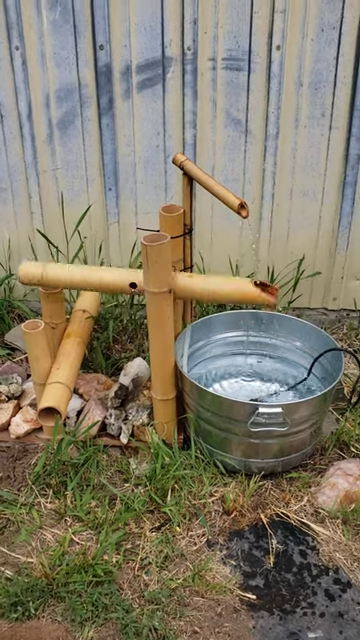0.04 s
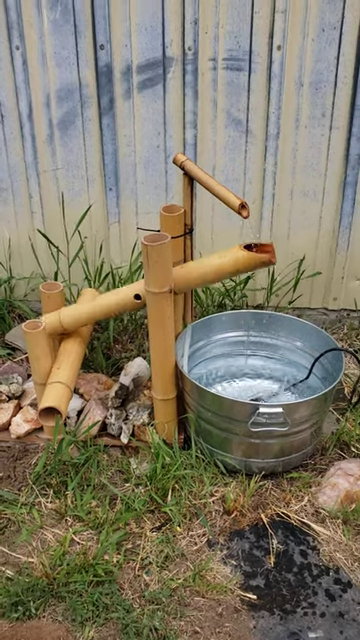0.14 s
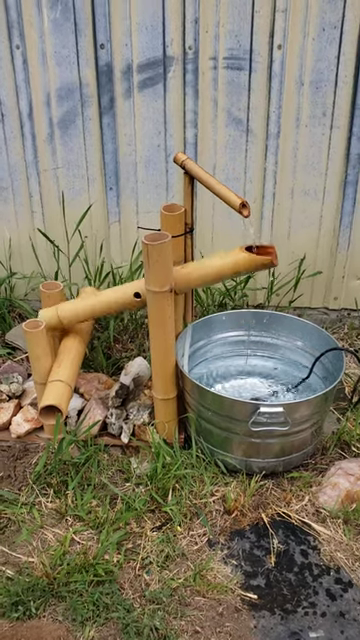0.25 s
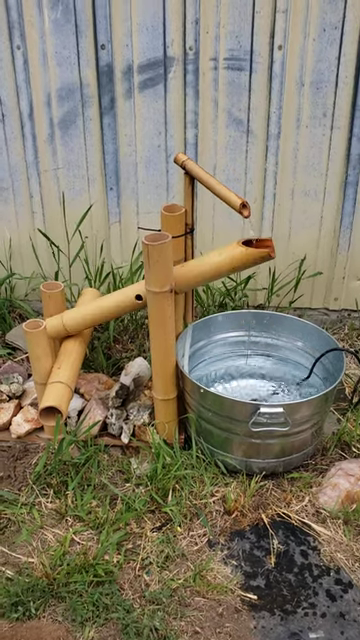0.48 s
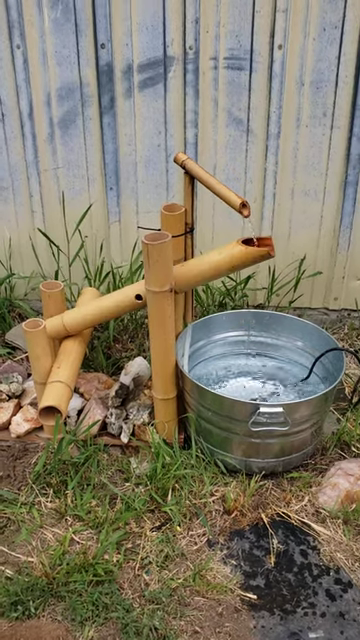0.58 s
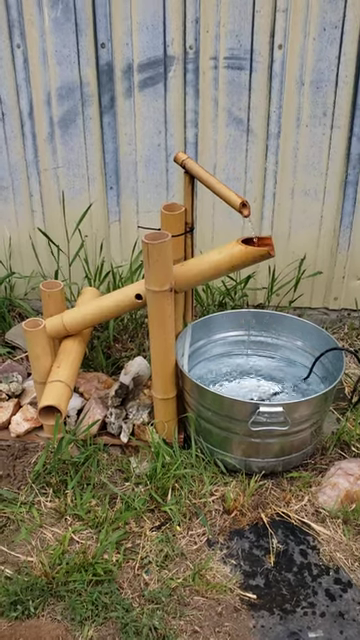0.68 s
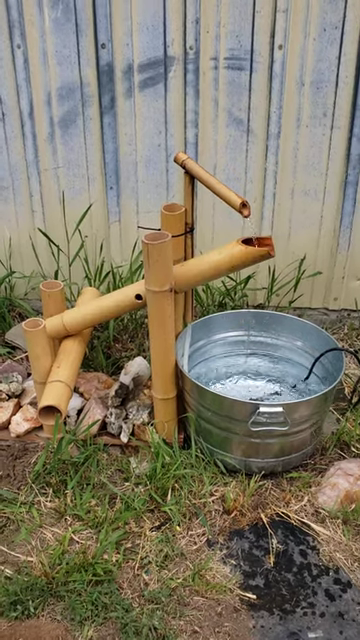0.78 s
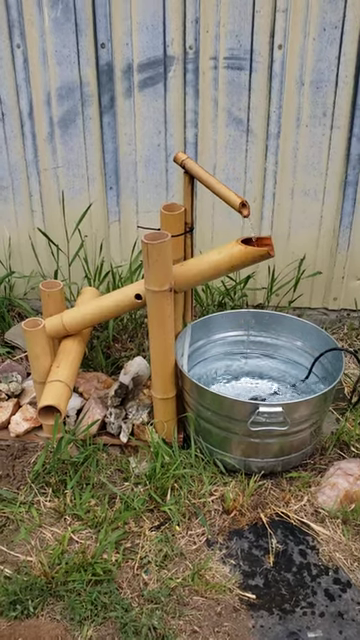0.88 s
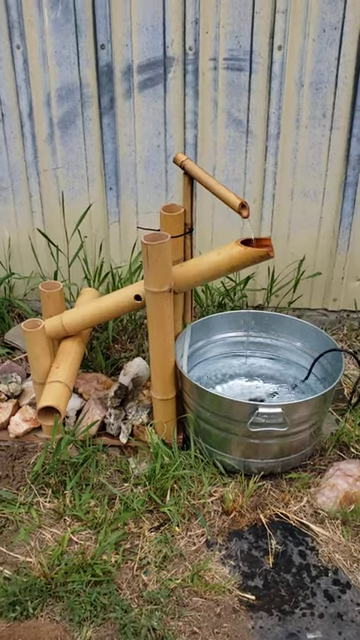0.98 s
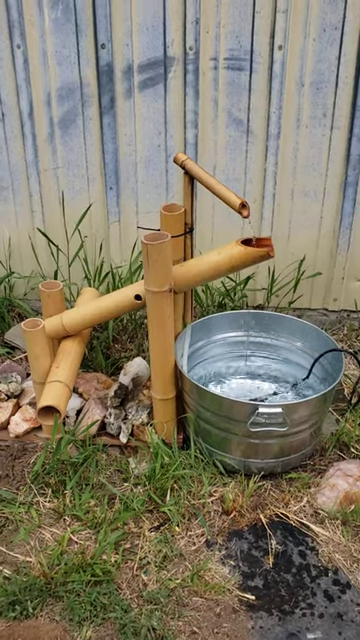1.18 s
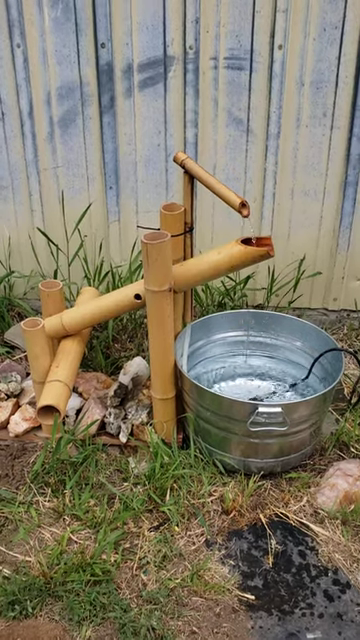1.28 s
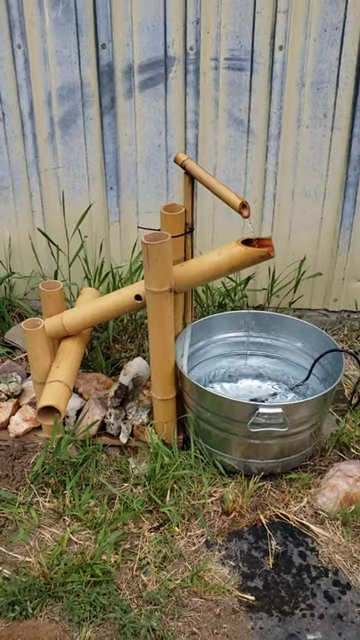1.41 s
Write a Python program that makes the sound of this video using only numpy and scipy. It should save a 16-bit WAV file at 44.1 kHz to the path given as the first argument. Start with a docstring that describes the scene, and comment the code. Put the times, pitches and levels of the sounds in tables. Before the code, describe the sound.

A bamboo tube knocks once, sharp and hollow, after a brief splash of water.

```python
"""Bamboo deer scarer in a garden

The last of the water splashes from a bamboo tube into a metal tub. The tube swings back, knocks
hard on its bamboo rest and bounces to a stop, with hollow gulps just after the blows and a short
echo from the yard. One drop ticks, crickets trill with their wings, a faint tone wavers far away
and wind or handling thumps softly on the microphone."""
import sys
import numpy as np
from scipy import signal
from scipy.fft import rfft, irfft
from scipy.io import wavfile

SR = 44100
rng = np.random.default_rng(int(sys.argv[2]) if len(sys.argv) > 2 else 0)


def persist_wave(psi):
    """Save psi, clipped to +-1, as 16-bit WAV."""
    counts = np.round(np.clip(psi, -1, 1) * 32767).astype(np.int16)
    wavfile.write(sys.argv[1], SR, np.atleast_2d(counts).T)


N = 63945

# The tube hits its rest: t/s, level/dB, contact time/s, brightness/(dB per octave), echo/dB,
# hum of the air inside/dB, share that rings on/0-1, lightness of the touch/0-1
KNOCKS = [(0.2289, -12.5, 0.0036, .5, -1, -33.5, 0.95, 0.1),
          (0.5040, -27, 0.0068, 0.3, -1.5, -41.5, 0.52, 0.38),
          (0.5918, -35.5, 0.0054, -1.64, 0.5, -48.5, 0.64, 0.73)]
# Tone colour of the cane's many short vibrations: f/Hz, level/dB
CRACK_COLOUR = [(60, -32), (160, -18.5), (400, -11.5), (1000, -6), (1500, -10), (2200, -9.5), (3200, -11.5),
                (4000, -9), (4700, -9.5), (5500, -13.5), (7200, -4), (8300, -21), (9300, -9.5),
                (10500, -14.5), (12000, -5.5), (13500, -13), (16000, -22.5)]
# How the crack dies away (a t60 is the time to fade by 60 dB): f/Hz, t60/s, echo/dB, echo t60/s
CRACK_FADES = [(143, 0.75, -4.5, 0.46), (480, 0.067, -16, 0.22), (1250, 0.11, -13, 0.28),
               (2860, 0.12, -23.5, 0.45), (6370, 0.043, -17.5, 0.11), (13000, 0.046, -30.5, .3)]
def bamboo_cracks():
    """Each blow clacks while the canes touch; part of it rings on, then the yard echoes."""
    half_width_hz, boost_db, crack_db = 19, 7.5, -1.5
    attack_s, clack_t60 = 0.00014, 0.0053
    # The hollow tube boosts the noise near its own notes.
    peaks = [1 / (1 + ((bin_hz() - note[0]) / half_width_hz) ** 2) for note in TUBE_NOTES]
    hollow = from_db(boost_db * np.max(peaks, axis=0))
    cane = rfft(coloured(CRACK_COLOUR)) * hollow
    yard = rfft(coloured(CRACK_COLOUR)) * hollow
    edges_hz, out = np.geomspace(40, 20480, 10), 0  # bands one octave wide
    for low, high in zip(edges_hz, edges_hz[1:]):
        hz = np.sqrt(low * high)
        band = (bin_hz() >= low) & (bin_hz() < high)
        direct, scattered = irfft(cane * band, N), irfft(yard * band, N)
        t60, tail_db, tail_t60 = (at_hz(CRACK_FADES, hz, column) for column in (1, 2, 3))
        for s, db, contact_s, bright_db, echo_db, _, rings_on, _ in KNOCKS:
            t = since(s)
            ring = rings_on * swell(t, attack_s, t60, contact_s)
            clack = (1 - rings_on) * swell(t, attack_s, clack_t60, contact_s)
            echo = from_db(tail_db + echo_db) * swell(t, rise_s=0.02, t60=tail_t60)
            gain = from_db(crack_db + db + bright_db * np.log2(hz / 2000))
            out = out + gain * (direct * (ring + clack) + scattered * echo)
    return out


# The notes the tube rings at: f/Hz, level/dB, change under a light touch/dB
TUBE_NOTES = [(530, -14.5, -6.5), (619, -15.5, 8), (664, -20, 10), (914, -14.5, 5), (978.2, -8, -15),
              (1122, -19.5, 5), (1410, -17, 0.5), (1452, -21, 4.5), (1597, -19.5, 2.5), (1973, -18, 13),
              (2258, -21.5, 5.5), (2560, -14.5, -4.5), (2727, -13, 3), (2858, -14, -0.5), (3560, -17, -1),
              (4690, -13, -0.5), (11900, -13.5, -4)]
def tube_ring():
    """Each blow sets the tube ringing and the air inside humming; a light one mixes the notes anew."""
    hum_hz, overtone_hz, out = 373, 675, 0
    for s, db, _, bright_db, _, hum_db, _, lightness in KNOCKS:
        t = since(s)
        hum = pan(-9) * sine(hum_hz, t) + from_db(-10.5) * sine(overtone_hz, t)
        hum_gain = from_db(hum_db + 2.17 * drift(rate_hz=37))
        out = out + hum_gain * swell(t, rise_s=0.006, t60=0.33) * hum
        for k, (hz, note_db, light_db) in enumerate(TUBE_NOTES):
            gain = from_db(db + note_db + bright_db * np.log2(hz / 500) + lightness * light_db)
            sides = pan(at_hz(STEREO, hz, column=2))
            t60 = 0.1 * (1000 / hz) ** 0.5  # high notes die sooner
            # Left and right swing a little out of step, which widens the sound.
            phase = np.arccos(at_hz(STEREO, hz)) * np.array([[0.5], [-0.5]])
            note = swell(t, rise_s=0.0032, t60=t60) * sine(hz, t, phase)
            out = out + (-1) ** k * gain * sides * note
    return out


def bamboo_tube():
    """A low cut takes the thump out of the knocks; soon after the last, their sound is faded out."""
    bass_cut_hz, fade_from_s = 139, 0.658
    bass_cut = signal.butter(2, bass_cut_hz, "high", fs=SR, output="sos")
    blows = signal.sosfilt(bass_cut, bamboo_cracks() + tube_ring())
    return blows * fade(since(fade_from_s), t60=0.83)


# Hollow gulps in the tube: t/s, f/Hz, level/dB, rise/s, t60/s
GULPS = [(.236, 524, -20.5, 0.0074, 0.038), (0.258, 576, -20, 0.0067, .1), (0.322, 577, -34, 0.0067, 0.087),
         (.520, 590, -36.5, 0.0071, 0.073)]
def gulps():
    """The hollow of the tube sounds again after the blows, as if water slopped back inside."""
    return sum(from_db(db) * swell(since(s), rise_s, t60) * sine(hz, since(s))
               for s, hz, db, rise_s, t60 in GULPS)


# Loudness of the falling water: t/s, level/dB
POUR = [(0, -51), (.095, -47.5), (.114, -51.5), (.14, -43.5), (.19, -48), (.36, -59.5), (.7, -69),
        (1.45, -75.5)]
# Single louder splashes: t/s, level/dB, decay time/s
SPLASHES = [(.0144, -45, 0.011), (.0478, -42, 0.0013), (0.0999, -32, 0.0033), (.1186, -36, 0.0057),
            (.167, -45.5, 0.0048), (0.55, -49, 0.0027)]
# Tone colour of the spray: f/Hz, level/dB
SPRAY_COLOUR = [(1500, -18.5), (3000, -16.5), (4200, -3), (6000, -1), (7100, 2), (8300, -11.5),
                (9800, -3.5), (13000, -0.5), (15500, -4)]
def falling_water():
    """Spray and droplets hit the tub, and the pour thins to a trickle."""
    flicker_db, splash_rise_s = 2.5, 0.0015
    flow = from_db(in_time(POUR) + flicker_db * drift(rate_hz=42))
    for s, db, decay_s in SPLASHES:
        t = since(s)
        flow = flow + from_db(db) * np.minimum(t / splash_rise_s, 1) * np.exp(-t / decay_s)
    hiss = coloured(SPRAY_COLOUR)
    droplets = from_db(-4.5) * coloured(SPRAY_COLOUR, clicks(per_s=1100))
    return flow * rms_one(hiss + droplets)


# Loudness of the bubbling: t/s, level/dB
BUBBLE_LEVEL = [(0, -50), (.15, -49), (.19, -62), (.45, -68), (.75, -92.5)]
# Tone colour of the bubbling: f/Hz, level/dB
BUBBLE_COLOUR = [(100, -22.5), (330, -3.5), (700, -6.5), (920, 0.5), (1200, -9), (1500, -4), (1950, -8),
                 (3500, -8), (6000, -25)]
def bubbles():
    """The water in the tub churns, and each bubble rings for a few cycles."""
    bubbles_per_s, ring_cycles = 860, 4.7
    pitches_hz, rings = np.geomspace(330, 3600, 24), 0
    for hz in pitches_hz:
        shrink, turn = fade(1 / SR, ring_cycles / hz), 2 * np.pi * hz / SR  # per sample
        kicks = clicks(bubbles_per_s / len(pitches_hz)) + 1e-18
        # This filter turns each click into a short, fading note.
        feedback = [1, -2 * shrink * np.cos(turn), shrink ** 2]
        rings = rings + hz * signal.lfilter([np.sin(turn)], feedback, kicks)
    churn = coloured(BUBBLE_COLOUR) + from_db(-5.5) * coloured(BUBBLE_COLOUR, rings)
    return from_db(in_time(BUBBLE_LEVEL)) * rms_one(churn)


def drip():
    """One drop ticks: a tiny bubble, rising in pitch."""
    start_hz, climb_hz_per_s, decay_s = 6600, 140000, 0.0009
    t = since(0.7896)
    envelope = np.minimum(t / decay_s, 1) * np.exp(1 - t / decay_s)
    return from_db(-39) * pan(9) * envelope * sine(start_hz + climb_hz_per_s * t / 2, t)


# Trills of the near crickets: t/s, length/s, f/Hz, level/dB
TRILLS = [(.6, .1, 4900, -60.5), (.81, .11, 4880, -59.5), (1.07, .11, 4920, -60), (1.05, .13, 5280, -65),
          (1.22, .045, 4870, -64.5), (1.28, .2, 4920, -58.5), (1.275, .2, 5260, -64)]
# Tone colour of the far crickets: f/Hz, level/dB
CHORUS_COLOUR = [(3900, -33), (4500, -6), (4850, 2.5), (5300, -6), (5800, -17), (6900, -10.5), (7800, -32)]
def crickets():
    """Trills of wing strokes that each fall in pitch, blurred by the yard, over a far chorus."""
    strokes_per_s, jitter, fall_hz = 29, 0.26, 380
    near = 0
    for s, length_s, hz, db in TRILLS:
        t = since(s)
        stroke = (t * strokes_per_s + jitter * drift(rate_hz=27)) % 1  # 0 to 1 in each stroke
        envelope = arch(t, length_s) * np.sin(np.pi * stroke) ** 2
        near = near + from_db(db) * pan(4) * envelope * glide(hz + fall_hz * (0.5 - stroke))
    yard = rms_one(rng.standard_normal((2, N)) * fade(since(0), t60=0.11)) / np.sqrt(N)
    echo = from_db(-1.5) * signal.fftconvolve(near, yard, axes=1)[:, :N]
    chorus = from_db(-69.5 + 0.5 * drift(rate_hz=36)) * coloured(CHORUS_COLOUR)
    return near + echo + chorus


# Soft low thumps: t/s, f/Hz, level/dB
THUMPS = [(.56, 67, -49), (0.893, 59.5, -51), (1.41, 65.5, -60.5)]
# Tone colour of the outdoor air: f/Hz, level/dB
AIR_COLOUR = [(15, -12), (60, 4.5), (120, -7.5), (260, -11.5), (500, -19), (1200, -14), (1500, -26.5),
              (16000, -34.5)]
def thumps_and_air():
    """Soft low thumps on the microphone, from wind or handling, over quiet outdoor air."""
    thumps = sum(from_db(db) * swell(since(s), rise_s=0.012, t60=0.2) * sine(hz, since(s))
                 for s, hz, db in THUMPS)
    return pan(-19) * thumps + from_db(-77.5) * coloured(AIR_COLOUR)


def far_tone():
    """A faint wavering tone swells and fades in the distance."""
    pitch_hz = 1205 + 12 * drift(rate_hz=30)
    return from_db(-84) * arch(since(0.92), length_s=0.18) * glide(pitch_hz)


# Spread between the two sides: f/Hz, how alike they are/0-1, left over right/dB
STEREO = [(50.1, .9, -8.5), (198, 0.18, -3.5), (564, 0.48, -1.5), (980, 0.44, -7), (2160, .25, -2),
          (5000, 0.072, -6), (7500, 0, 11), (11900, 0.21, -10.5)]
def coloured(colour, source=None):
    """Give two unrelated signals (white noise by default) a tone colour and a stereo spread."""
    mid, side = rfft(rng.standard_normal((2, N)) if source is None else source)
    hz = bin_hz()
    alike = at_hz(STEREO, hz)
    both = np.sqrt(1 + alike) * mid + np.sqrt(1 - alike) * side * [[1], [-1]]
    gains = from_db(at_hz(colour, hz)) * pan(at_hz(STEREO, hz, column=2))
    return rms_one(irfft(both * gains, N))


def clicks(per_s):
    """Random clicks of uneven size, left and right."""
    size_db = 4 * np.minimum(rng.exponential(1, (2, N)), 4)
    sizes = from_db(size_db) * rng.choice([-1, 1], (2, N))
    return sizes * (rng.random((2, N)) < per_s / SR)


def drift(rate_hz):
    """A smooth random wobble, typically of size 1."""
    return rms_one(irfft(rfft(rng.standard_normal(N)) / (1 + (bin_hz() / rate_hz) ** 2), N))


def sine(hz, t, phase=0):
    """A pure tone."""
    return np.sin(2 * np.pi * hz * t + phase)


def glide(hz):
    """A tone that follows a changing pitch."""
    return np.sin(2 * np.pi * np.cumsum(hz) / SR)


def fade(t, t60):
    """Die away by 60 dB every t60 seconds."""
    return np.exp(-np.log(1000) * t / t60)


def swell(t, rise_s, t60, hold_s=0):
    """Rise, hold, then die away."""
    return np.minimum(t / rise_s, 1) * fade(np.maximum(t - rise_s - hold_s, 0), t60)


def arch(t, length_s):
    """A rounded rise and fall."""
    return np.sqrt(np.abs(np.sin(np.pi * np.minimum(t / length_s, 1))))


def since(s):
    """Seconds since a moment, zero before it."""
    return np.maximum(np.arange(N) / SR - s, 0)


def in_time(rows):
    """Join a table's points in time with straight lines."""
    return np.interp(since(0), *np.transpose(rows))


def at_hz(rows, hz, column=1):
    """Read a table between its frequencies, on a scale of octaves."""
    rows = np.array(rows)
    return np.interp(np.log(np.maximum(hz, 1)), np.log(rows[:, 0]), rows[:, column])


def bin_hz():
    """The frequencies of the spectrum."""
    return np.arange(N // 2 + 1) * SR / N


def pan(db):
    """Left and right gains at constant power; positive dB leans left."""
    gains = from_db(np.array([[0.5], [-0.5]]) * db)
    return gains / np.sqrt(np.mean(gains ** 2, axis=0))


def from_db(db):
    """Turn decibels into a multiplier."""
    return 10 ** (np.asarray(db) / 20)


def rms_one(x):
    """Scale to an average power of 1."""
    return x / np.sqrt(np.mean(x ** 2) + 1e-20)


def scene():
    """The scarer, its water and the garden."""
    scarer = bamboo_tube() + gulps()
    water = falling_water() + bubbles() + drip()
    return scarer + water + crickets() + far_tone() + thumps_and_air()


def record(dry):
    """Clip peaks at full scale and steeply cut the highest treble."""
    cutoff_hz = 16000
    treble_cut = signal.ellip(12, 0.1, 90, cutoff_hz, fs=SR, output="sos")
    return signal.sosfilt(treble_cut, np.clip(dry, -1, 1))


dry = scene()
out = record(dry)
persist_wave(out)
```